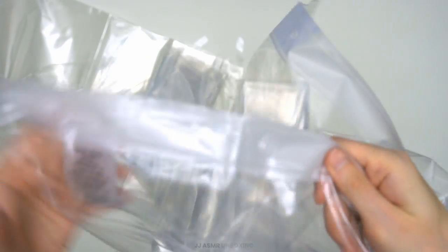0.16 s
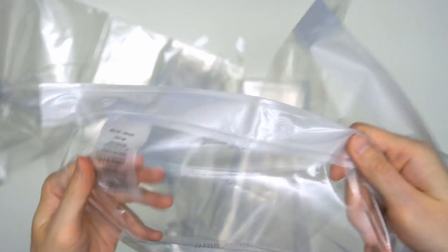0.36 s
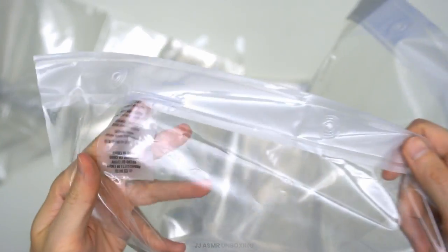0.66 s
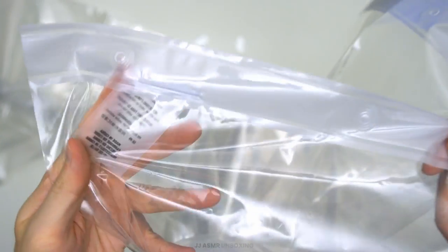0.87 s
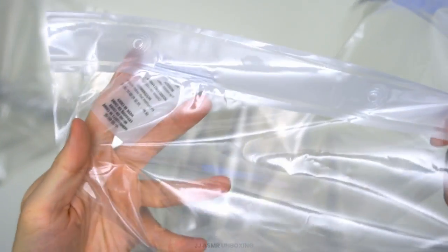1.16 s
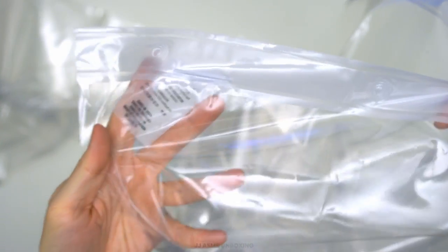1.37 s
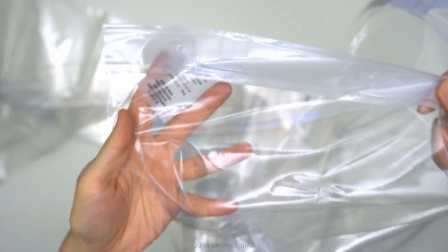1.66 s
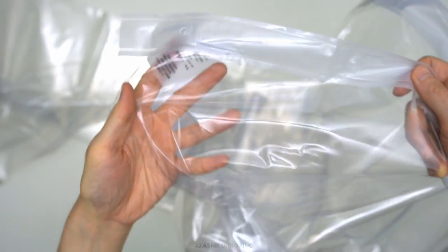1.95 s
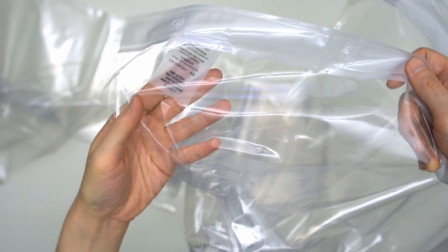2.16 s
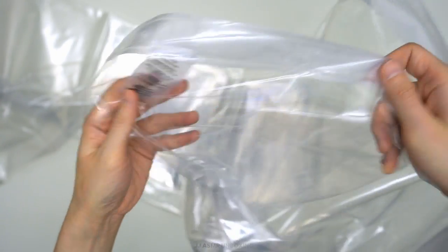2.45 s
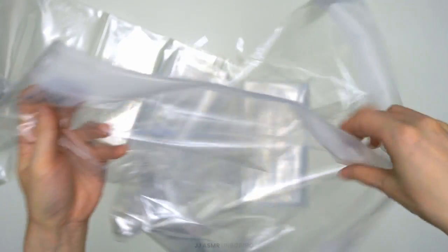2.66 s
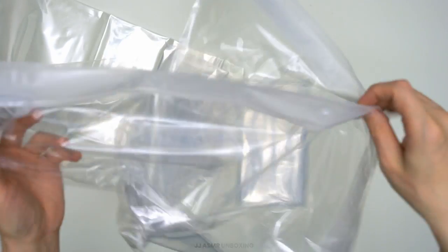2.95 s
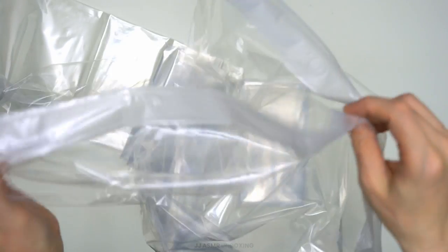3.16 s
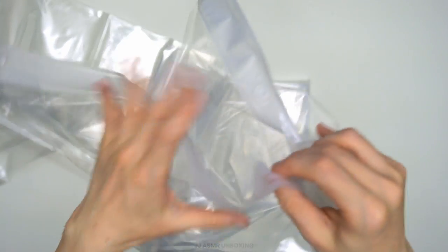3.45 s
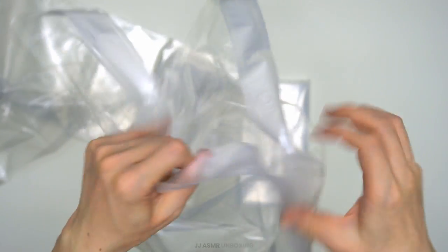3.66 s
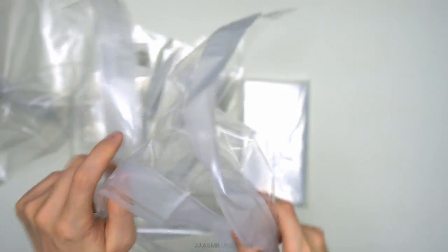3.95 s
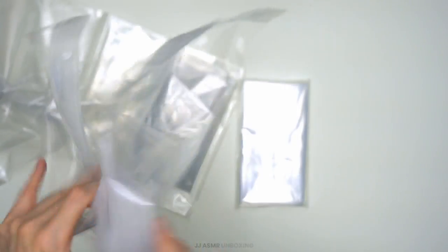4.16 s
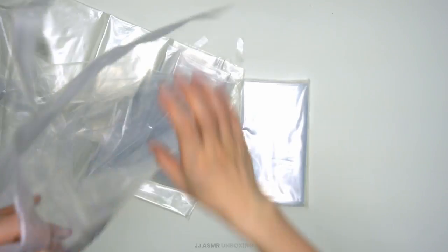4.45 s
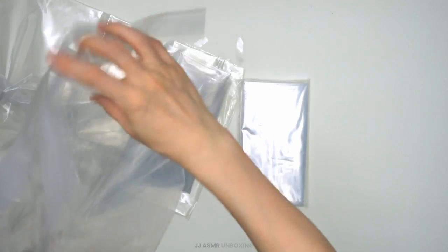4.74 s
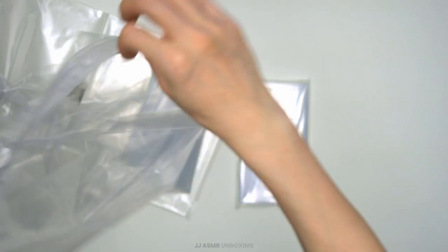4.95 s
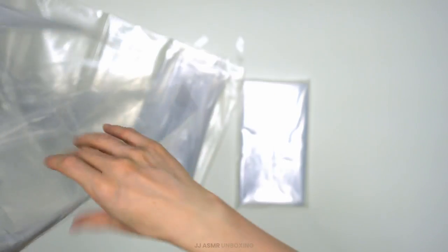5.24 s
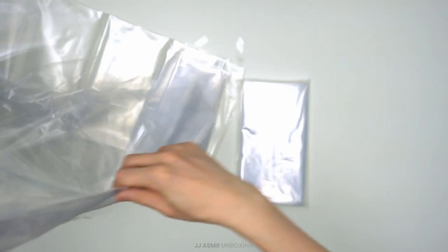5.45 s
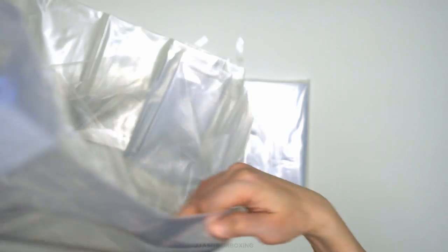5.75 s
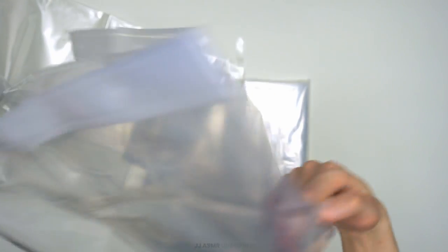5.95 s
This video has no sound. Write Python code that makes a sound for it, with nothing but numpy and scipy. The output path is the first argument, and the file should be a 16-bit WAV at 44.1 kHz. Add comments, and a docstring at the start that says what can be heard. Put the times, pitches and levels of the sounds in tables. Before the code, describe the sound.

Hands unfold a thin, stiff plastic sheet close by, with sharp crackling snaps, fine rustling and soft puffs of air in a small quiet room.

```python
"""A thin, stiff plastic sheet snaps crease by crease as hands unfold it over a table, heard from close by.
Snaps: timed noise bursts coloured as facet, loose flap and crease edge. Rustle: random small buckles between.
Trapped air: short damped sines. Draught: low noise in puffs and thuds. Room tone: steady shaped noise.
The walls of a small quiet room answer with decaying noise tails. Overall, the treble rolls off, steeply
above 15 kHz, silent above 17 kHz; peaks are softly limited."""
import sys
import numpy as np
from scipy import signal
from scipy.fft import rfft, irfft, next_fast_len
from scipy.io import wavfile

SR = 44100
rng = np.random.default_rng(int(sys.argv[2]) if len(sys.argv) > 2 else 0)


def wav_record(signal):
    """Record a signal, one row per channel, as 16-bit PCM in the file named by sys.argv[1]."""
    frames = np.transpose(np.atleast_2d(signal))
    bounded = np.clip(frames, -1, 1)
    # unit amplitude maps onto the largest positive 16-bit level
    quanta = np.round(bounded * 32767).astype(np.int16)
    wavfile.write(sys.argv[1], SR, quanta)


N = 269451


def amp(db):
    """Decibels to gain."""
    return 10 ** (np.asarray(db) / 20)


def unit(x):
    """Each row at rms 1."""
    return x / np.sqrt(np.mean(x ** 2, axis=-1, keepdims=True) + 1e-20)


def along(points, hz):
    """(Hz, value) points interpolated on a log frequency axis."""
    point_hz, value = np.transpose(points)
    return np.interp(np.log(hz + 1), np.log(point_hz + 1), value)


def filtered(x, response):
    """x times a response of frequency, zero-padded."""
    size = next_fast_len(N + SR // 2)
    spectrum = rfft(x, size) * response(np.fft.rfftfreq(size, 1 / SR))
    return irfft(spectrum, size)[..., :N]


def resonance(hz, centre_hz, sharpness):
    """Causal second-order band-pass of peak gain 1."""
    damping = 1j * hz * centre_hz / sharpness
    return damping / (centre_hz ** 2 - hz ** 2 + damping)


# room tone spectrum, relative: (frequency [Hz], density [dB per Hz])
TONE_SPECTRUM = [(20, -3), (40, -2), (66, -7.5), (250, -12), (600, -24), (1200, -16.5), (5000, -25),
                 (9000, -21.5), (15500, -14.5)]
TONE_DB = -46.5


def room_tone():
    """Steady noise of the quiet room, shaped by its spectrum."""
    tone = filtered(rng.standard_normal(N), lambda hz: amp(along(TONE_SPECTRUM, hz)))
    return amp(TONE_DB) * unit(tone)


# reverberation time: (frequency [Hz], t60 [s])
WALL_T60 = [(400, 0.18), (1500, 0.088), (5000, 0.25), (9000, 0.091), (14000, 0.21)]
# initial tail spectrum, relative: (frequency [Hz], level [dB])
WALL_COLOUR = [(400, 7), (800, -3), (2000, -4.5), (3000, -9.5), (5000, -4.5), (7000, -1), (9000, -4),
               (14000, -3.5)]
WALL_GAP_SAMPLES = 130


def room(x, count):
    """Walls answer after a short gap; the sheet moves, so each of count stretches gets its own noise tail."""
    wet = np.zeros(N + SR)
    edges = np.linspace(0, N, count + 1).astype(int)
    for start, end in zip(edges, edges[1:]):
        hz, t, noise = signal.stft(rng.standard_normal(SR // 2), SR, nperseg=256)
        colour_db = along(WALL_COLOUR, hz)[:, None]
        fade_db = colour_db - 60 * t / along(WALL_T60, hz)[:, None]
        tail = signal.istft(noise * amp(fade_db), SR, nperseg=256)[1][:SR // 2]
        echo = signal.fftconvolve(x[start:end], tail / np.linalg.norm(tail))
        wet[start:start + len(echo)] += echo
    return np.pad(wet, (WALL_GAP_SAMPLES, 0))[:N]


# air puffs from quick folds: (time [s], peak level [dB])
AIR_PUFFS = [(.43, -35.5), (.8, -47), (.87, -51), (1.03, -47), (1.43, -75), (2.67, -34), (2.87, -49),
             (3.53, -53), (3.6, -41), (3.68, -49), (3.91, -44.5), (4.27, -54), (5.37, -51)]
PUFF_RISE_S, PUFF_FALL_S = 0.026, 0.024
# steady air: base level, dB gained per dB of hand work, loss as the sheet is laid aside
AIR_DB, AIR_FOLLOWS, AIR_FADE_DB_PER_S = -33.5, 0.43, 1.22
KICK_DB, KICK_FADE_S = -19, 0.012  # air kicked by each flap: level over the flap, time constant


def draught():
    """Moved air as low noise: steady with the hands, in puffs at quick folds, a small thud at each snap's flap."""
    t = np.arange(N) / SR
    hand_s, hand_db = np.transpose(HAND_WORK)[:2]
    hands_now_db = np.interp(t, hand_s, hand_db)
    strength = amp(AIR_DB + AIR_FOLLOWS * hands_now_db - AIR_FADE_DB_PER_S * t)
    for s, db in AIR_PUFFS:
        puff = np.exp(np.minimum((t - s) / PUFF_RISE_S, (s - t) / PUFF_FALL_S))
        strength = strength + amp(db) * puff

    snap_s, *_, flap_db, _ = np.transpose(CREASE_SNAPS)
    kicks = np.bincount(np.round(snap_s * SR).astype(int), amp(flap_db + KICK_DB), N)
    kicks = signal.fftconvolve(kicks, np.exp(-t[:SR // 8] / KICK_FADE_S))[:N]

    thuds = filtered(rng.standard_normal(N), lambda hz: resonance(hz, 270, 0.43) ** 2)
    air = filtered(rng.standard_normal(N), lambda hz: resonance(hz, 80, 0.18) ** 2)
    return strength * unit(air) + kicks * unit(thuds)


# air between layers, ringing as a fold closes: (time [s], pitch [Hz], level before soft start [dB], t60 [s])
AIR_POCKETS = [ (.243, 505, -23.5, 0.06), (0.403, 465, -11.5, 0.056), (0.405, 960, -11.5, 0.045),
               (0.426, 476, -20, 0.042), (0.842, 470, -24.5, 0.096), (1.311, 688, -29.5, 0.11),
               (1.349, 1020, -39, 0.066), (2.675, 586, -12, 0.061), (2.724, 350, -19, 0.038),
               (2.759, 396, -13, 0.023), (3.674, 484, -19, 0.036), (4.235, 545, -23.5, 0.081),
               (4.8749, 1325, 0, 0.014), (4.873, 2330, -1, 0.0079), (5.645, 530, -19.5, 0.071), ]
POCKET_WANDER_CYCLES = .006  # phase drift per sample, standard deviation


def pockets():
    """Hollow, quickly damped sines with a soft start."""
    out, t = np.zeros(N + SR), np.arange(SR // 8) / SR
    for s, hz, db, t60_s in AIR_POCKETS:
        # the pocket changes shape as it rings
        cycles = hz * t + np.cumsum(rng.normal(0, POCKET_WANDER_CYCLES, len(t)))
        fade = amp(db - 60 * t / t60_s)
        soft_start = 1 - np.exp(-(hz * t / 0.68) ** 2)
        out[round(s * SR):][:len(t)] += fade * soft_start * np.sin(2 * np.pi * cycles)
    return out[:N]


FRAME = 768  # samples per buckle
RING = 1.1  # strength of a facet's own notes


def buckles(rows, flap_hz, first_db, die_ms, rise, spiky_db, edge_haste):
    """Each row is a ragged burst of cracks that shakes a facet, flaps the loose sheet and hisses at the crease.
    Returns the near sound and what goes to the walls: summed over all directions, its colour is smooth."""
    s, burst_ms, facet_hz, facet_db, flap_db, edge_db = np.transpose(rows)[:, :, None]
    ms, hz = np.arange(FRAME) / SR * 1000, np.fft.rfftfreq(FRAME, 1 / SR)

    unevenness = amp(spiky_db * rng.standard_normal((len(s), FRAME)))
    cracks = rng.standard_normal((len(s), FRAME)) * unevenness
    # quick snaps open with one thin, strong crack; slow creases roll in softly
    first = np.sign(cracks[:, :1]) * amp(first_db) / burst_ms * (ms == 0)
    start = 1 - np.exp(-ms / (rise * burst_ms))
    after_burst_ms = np.clip(ms - burst_ms, 0, None)
    hold = start * np.exp(-after_burst_ms / die_ms - ms / 8)

    facet = resonance(hz, facet_hz, .7) ** 2 / (1 + 1j * hz / 8000) ** 2
    note_hz = facet_hz * 2 ** rng.uniform(-0.75, 1, (2, len(s), 1))  # two notes per facet
    notes = 1 + RING * resonance(hz, note_hz, 6).sum(axis=0)
    radiates = (1j * hz / 500 * resonance(hz, 500, 1.0)) ** 2  # too small a sheet to send out bass
    flap = resonance(hz, flap_hz, 0.64) ** 2 * radiates
    edge = resonance(hz, 11500, .8) ** 3

    near = far = 0
    for db, colour, own, shape in [
        (facet_db, facet, notes, hold),
        (flap_db, flap, 1, hold ** .5),  # the loose sheet is slower to settle
        (edge_db, edge, 1, hold ** edge_haste),
    ]:
        gain = amp(db) * np.sqrt(.005 * SR / FRAME)  # row levels are rms over 5 ms
        burst = irfft(rfft(first + cracks * shape) * colour * own, FRAME)
        near = near + gain * unit(burst)
        far = far + gain * unit(irfft(colour, FRAME))
    where = np.round(s * SR).astype(int) + np.arange(FRAME)
    return np.array([np.bincount(where.ravel(), sound.ravel(), N + FRAME)[:N] for sound in (near, far)])


# hand work: (time [s], small-buckle level [dB], flap over it [dB], edge hiss over it [dB])
HAND_WORK = [(0, -35, 4.5, -3), (.2, -35.5, -4, 4), (.4, -36, 1.5, -3), (.56, -41, 5, 6.5),
             (.71, -47, 8, 3), (0.811, -32, 2, 4.5), (.92, -52.5, 4, 3), (1.05, -55, 2, 1),
             (1.4, -57, 2, -7), (1.72, -69, -14, 0), (2.02, -38, -36, 7.5), (2.3, -57, 2, -11),
             (2.45, -44, 1, -3), (2.7, -31, 1, 2), (2.94, -37.5, -1.5, -3), (3.13, -35.5, -8, 5),
             (3.28, -38.5, -23, 0), (3.4, -48, -34, 11.5), (3.56, -32, -5, 2.5), (3.76, -41, -2, 2.5),
             (4.0, -36.5, -2, 3.5), (4.3, -30.5, -8.5, -4), (4.68, -40, -2.5, 0.5), (4.94, -32, -5.5, 0),
             (5.25, -38, -9, 4), (5.44, -31, 0.5, 0.5), (5.58, -44, 4.5, 8), (5.78, -30.5, 2.5, 1),
             (5.93, -42, 0, 3), (6.11, -53.5, 11.5, -15)]
CROWD_BEFORE_S, CROWD_AFTER_S = 0.0087, 0.023  # reach round a snap, time constants
CROWD_SHARE, CROWD_MID_DB = 0.34, -32.5  # dB per dB of snap; snap level that changes nothing


def rustle(count, faint_db, facet_hz):
    """Random small buckles, most faint and a few strong, following the hands and louder round the snaps."""
    when, size, length, pitch = rng.random((count, 4)).T
    s = when * N / SR
    hand_s, level_db, flap_db, edge_db = np.transpose(HAND_WORK)
    snap_s, _, _, *snap_dbs = np.transpose(CREASE_SNAPS)
    since_s = s[:, None] - snap_s
    close = np.exp(np.minimum(since_s / CROWD_BEFORE_S, -since_s / CROWD_AFTER_S))
    size_db = faint_db - 4 * np.log(1 - .97 * size)

    dbs = []
    for over_db, snap_db in zip((0, flap_db, edge_db), snap_dbs):
        nearby_db = 20 * np.log10(close @ amp(snap_db) + 1e-5)
        hands_now_db = np.interp(s, hand_s, level_db + over_db)
        crowd_db = CROWD_SHARE * (nearby_db - CROWD_MID_DB)
        dbs.append(hands_now_db + crowd_db + size_db + rng.normal(0, 2.77, count))

    burst_ms = 1.18 + 3 * length ** 2
    rows = np.transpose([s, burst_ms, facet_hz * 5.5 ** (pitch - .5), *dbs])
    return buckles(rows, flap_hz=820, first_db=17, die_ms=.9, rise=.25, spiky_db=2.5, edge_haste=.8)


# creases snapping over: (time [s], burst [ms], facet pitch [Hz], facet [dB], flap [dB], edge [dB])
CREASE_SNAPS = [(0.0009, 1.3, 3060, -13.5, -19.5, -15.5), (0.0255, 0.46, 2470, -20.5, -46, -27),
                (0.0313, 1.2, 3200, -23, -39, -20), (0.048, 1.9, 2490, -25, -39, -35),
                (0.057, 0.52, 3560, -23, -42, -54), (0.067, 1.4, 1740, -25, -28, -50),
                (0.0735, 1.2, 4500, -24, -44, -13.5), (0.077, 2.3, 3670, -19, -44, -20),
                (0.0832, 9.4, 3780, -29, -29, -29), (0.105, 0.77, 2930, -27, -33, -40),
                (0.1126, 2, 2500, -34, -26.5, -45), (0.1217, 1.3, 4540, -25, -47, -6.5),
                (0.125, 1.3, 3930, -25, -48, -12), (0.1318, 0.93, 5330, -18.5, -23, -22),
                (0.1454, 3.1, 4030, -40, -24.5, -25), (0.151, 3, 2960, -16, -50, -38),
                (0.168, 1.5, 4000, -33, -42, -36), (0.1751, 0.56, 4100, -18, -24.5, -30),
                (0.243, 1.4, 2550, -26, -24, -59), (0.262, 1.5, 4670, -19, -28.5, -17.5),
                (0.2889, 1.3, 2300, -30, -38, -51), (0.336, 1.3, 3440, -26.5, -27, -45),
                (0.3433, 1.8, 2570, -38, -28, -22.5), (0.358, 1.2, 2500, -34, -51, -49),
                (0.366, 1.7, 3620, -24.5, -44, -44), (0.383, 1.5, 5800, -16, -24.5, -6),
                (0.389, 2.5, 2780, -31, -41, -26), (0.3986, 5.8, 2000, -48, -20, -52),
                (0.4067, 1.5, 1250, -25.5, -19, -55), (0.424, 3.3, 1470, -44, -27, -52),
                (0.4476, 2, 3630, -27, -40, -26), (0.455, 10, 5100, -21.5, -31, -18.5),
                (0.4773, 1, 2970, -29, -40, -45), (0.5107, 3, 5700, -22.5, -56, -18),
                (0.5537, 1.2, 3880, -20, -68, -27), (0.5708, 2.3, 3400, -27, -49, -37),
                (0.6299, 1.4, 1760, -37, -34.5, -60), (0.6557, 3.2, 1260, -36, -76, -64),
                (0.7, 1.6, 1480, -38.5, -50, -47), (0.7462, 3.2, 4000, -27.5, -30, -21.5),
                (0.8013, 2.3, 3750, -37, -54, -20), (0.816, 27, 5230, -23.5, -57, -52),
                (0.8365, 1.5, 4000, -29, -43, -24), (0.8449, 4.5, 5530, -18.5, -23.5, -12),
                (0.8556, 1.5, 1700, -46, -31, -71), (0.8964, 0.73, 4400, -27, -30, -31),
                (0.9375, 2, 3940, -25.5, -30, -31), (0.9636, 1.2, 2810, -32, -56, -61),
                (0.9765, 0.92, 3220, -35, -34, -33), (1.005, 2, 5000, -13.5, -21.5, -15),
                (1.0119, 0.64, 3200, -27, -33, -15.5), (1.0274, 0.33, 2900, -15.5, -28, -37),
                (1.1259, 4.1, 3640, -25, -34, -24), (1.2079, 1.1, 1230, -31.5, -68, -45),
                (1.2198, 2.4, 1450, -49, -40, -64), (1.242, 2.4, 3380, -40.5, -40.5, -29),
                (1.3102, 5.6, 2030, -35, -30, -40), (1.3336, 1.6, 1800, -50, -46, -69),
                (1.3487, 13, 1360, -62, -41, -74), (1.419, 1.3, 5300, -12, -26, -5.5),
                (1.477, 1.1, 3460, -49, -43, -54), (1.5172, 1.4, 2870, -23, -36.5, -29),
                (1.547, 2.4, 2670, -39, -43, -51), (1.595, 3.8, 1500, -64, -44.5, -64),
                (1.6781, 1.5, 3400, -31, -41, -65), (1.7063, 3.3, 1860, -47, -40, -61),
                (1.782, 1.4, 1860, -45.5, -45.5, -68), (1.813, 1.5, 3200, -69, -71, -64),
                (1.8617, 1.4, 2850, -30, -35, -34.5), (1.9502, 9.7, 1300, -53, -39, -48),
                (2.0343, 3.6, 2670, -48, -44, -53), (2.045, 2.4, 1580, -65, -34.5, -74),
                (2.072, 2, 6000, -58, -65, -53), (2.1144, 1.6, 3340, -29.5, -26.5, -27),
                (2.1896, 1.9, 2950, -29.5, -30, -46), (2.2155, 1.8, 5000, -49, -62, -40),
                (2.2816, 0.57, 3140, -33.5, -28, -44), (2.3437, 1.4, 2770, -26.5, -25, -30.5),
                (2.3742, 0.98, 2740, -41, -39, -31.5), (2.391, 2.3, 2640, -41, -35, -60),
                (2.4173, 11, 3570, -27.5, -27.5, -42), (2.434, 1.1, 4500, -26, -42, -24),
                (2.4523, 0.89, 4960, -16, -45, -7.5), (2.538, 3.4, 3520, -25, -21, -31),
                (2.5524, 2.4, 2330, -37, -26, -29), (2.565, 1.5, 5000, -36, -48, -35),
                (2.598, 1.8, 3280, -21.5, -28, -17), (2.608, 1.4, 4500, -21, -32, -20),
                (2.6189, 8.7, 2840, -29, -25, -41), (2.6305, 1.4, 3300, -22.5, -45, -45),
                (2.644, 4.1, 1500, -37, -36, -50), (2.6577, 1, 4800, -20, -27, -22),
                (2.6698, 2.2, 3930, -18, -35, -22), (2.6758, 1.3, 3060, -12.5, -19.5, -12),
                (2.6867, 1.6, 3320, -13, -40, -16), (2.724, 4.3, 2600, -32, -23, -31),
                (2.7428, 2, 2000, -32, -35, -50), (2.7464, 0.56, 4800, -13, -20.5, -4),
                (2.7748, 4, 4800, -18.5, -34, -41), (2.7997, 2.2, 2780, -33, -37, -48),
                (2.8298, 3, 3040, -34, -32, -30), (2.842, 3.7, 3620, -24, -28, -40),
                (2.8676, 1.4, 3240, -15, -20.5, -9), (2.892, 1.5, 3960, -20.5, -50, -48),
                (2.9068, 0.71, 3800, -20, -21, -13), (2.92, 2.2, 4600, -21, -29, -47),
                (2.9545, 1.1, 2950, -23, -23, -12), (3.001, 2, 1600, -63, -30, -61),
                (3.019, 4.1, 2720, -29.5, -49, -57), (3.0569, 0.59, 2030, -35, -35, -44),
                (3.085, 2.1, 2870, -32.5, -59, -64), (3.112, 25, 3570, -24, -53, -33),
                (3.13, 10, 4600, -21, -43, -18.5), (3.1391, 2.5, 2500, -24, -36, -45),
                (3.1474, 1.1, 2500, -28, -41, -51), (3.2135, 1.5, 4400, -22.5, -26, -46),
                (3.261, 6, 3800, -31, -37.5, -33), (3.284, 14, 3500, -35.5, -42, -37),
                (3.372, 2, 1100, -49, -58, -80), (3.403, 2, 1290, -50, -47, -57),
                (3.42, 1.6, 1100, -55, -54, -70), (3.483, 1.6, 1200, -57, -55, -57),
                (3.517, 9.4, 3000, -42, -35, -36), (3.5435, 3.1, 3280, -23, -36, -38),
                (3.578, 1.2, 5700, -13, -22.5, -12), (3.5994, 3.6, 3750, -38, -51, -39),
                (3.608, 0.79, 2500, -26.5, -20.5, -43), (3.6474, 1.6, 3520, -33, -27.5, -45),
                (3.6749, 4.5, 3150, -19.5, -19.5, -21), (3.683, 3.3, 3860, -20.5, -22, -19),
                (3.708, 2.9, 3050, -25, -57, -50), (3.7282, 1, 4730, -21.5, -29.5, -25),
                (3.813, 2.5, 2930, -30, -59, -41), (3.849, 6.5, 3200, -35, -34, -24.5),
                (3.8652, 1.3, 5300, -24, -54, -21), (3.8834, 20, 3640, -23.5, -29, -38),
                (3.9089, 1.3, 2810, -18, -23.5, -19.5), (3.919, 6.4, 2900, -48, -24.5, -53),
                (3.9908, 1.8, 4300, -21, -37, -33), (4.088, 2.7, 3730, -27.5, -50, -28),
                (4.1135, 3, 3400, -21, -28, -55), (4.1933, 4.4, 1630, -39, -28, -38),
                (4.206, 7.8, 2210, -21.5, -22.5, -18.5), (4.236, 1.6, 1810, -21.5, -21, -26),
                (4.2633, 0.83, 2860, -19.5, -28, -23.5), (4.224, 1, 2500, -28, -37, -35),
                (4.292, 2, 1500, -54, -52, -53), (4.31, 10, 2500, -46, -39, -45),
                (4.327, 2.7, 2720, -29, -36, -49), (4.335, 20, 2110, -22.5, -53, -20),
                (4.341, 7.1, 4300, -21.5, -53, -40), (4.3483, 5, 3740, -19, -23.5, -9),
                (4.366, 0.86, 4600, -17.5, -57, -22), (4.3732, 5.7, 3500, -23, -31.5, -36),
                (4.44, 4.7, 2970, -30, -35, -35), (4.4748, 3, 2800, -39, -39, -43),
                (4.515, 25, 1880, -30, -32, -48), (4.5359, 3.6, 3260, -26, -30, -33),
                (4.553, 3.1, 4500, -34, -42, -31), (4.5826, 1, 3040, -13, -20, -17.5),
                (4.606, 3.4, 3400, -49, -27, -42), (4.613, 0.87, 3100, -29, -33, -44),
                (4.625, 1.3, 4360, -33, -40, -22), (4.6658, 0.84, 5230, -21, -50, -17),
                (4.7276, 1.1, 3240, -35, -44, -55), (4.7358, 1.1, 2160, -38, -52, -53),
                (4.7835, 22, 2480, -40, -42, -39), (4.8693, 1, 1800, -40, -42, -44),
                (4.8728, 3.6, 4380, -21.5, -27.5, -14.5), (4.9195, 2.1, 1500, -43, -27.5, -57),
                (4.9255, 9.7, 2200, -33, -29, -50), (4.941, 3.2, 2000, -37, -29, -61),
                (4.989, 2.3, 2300, -38, -37, -64), (5.0196, 2.3, 5600, -23.5, -33, -52),
                (5.0363, 2.5, 3300, -32.5, -22.5, -24), (5.1068, 1.6, 2060, -49, -30, -40),
                (5.1246, 1.8, 5100, -27.5, -36, -40), (5.135, 3.9, 3030, -32, -30, -54),
                (5.1552, 4.9, 3000, -34, -36, -28), (5.167, 2.9, 1500, -45, -29, -51),
                (5.246, 3.3, 4500, -37, -53, -51), (5.259, 2.9, 3200, -29, -30.5, -36),
                (5.2929, 2.9, 4440, -28, -44, -40), (5.3257, 4, 1920, -52, -46, -60),
                (5.3684, 2.9, 4160, -14.5, -20.5, -36), (5.3985, 1.6, 4040, -29, -29, -30),
                (5.443, 2.4, 1820, -40, -39, -46), (5.414, 3, 2500, -41, -27, -50),
                (5.451, 2.9, 3980, -29, -30, -42), (5.468, 4.3, 3350, -27, -59, -45),
                (5.5178, 1.4, 2300, -27, -41, -62), (5.528, 2.2, 2000, -37, -48, -66),
                (5.605, 4.4, 2380, -33, -71, -72), (5.6459, 1.2, 3160, -18, -21.5, -26),
                (5.6903, 3.1, 2700, -25.5, -38, -33), (5.781, 3, 3800, -44, -55, -50),
                (5.808, 4.5, 2740, -36, -57, -69), (5.835, 1.8, 1120, -36, -45, -61),
                (5.884, 4.9, 2030, -39, -61, -62), (5.9012, 5.5, 3340, -32.5, -33.5, -35),
                (5.93, 8.1, 2710, -41, -35.5, -34), (5.982, 2.4, 3800, -30.5, -86, -38),
                (6.05, 3.3, 1340, -42, -45, -70), (6.072, 5, 2960, -51, -61, -65)]


def snaps():
    """Creases snap over one by one: strong buckles whose crease hiss dies first."""
    return buckles(CREASE_SNAPS, flap_hz=1102, first_db=18.5, die_ms=1.67, rise=0.076, spiky_db=4.5,
                   edge_haste=1.9)


def scene():
    """The sheet, its room and the quiet behind it."""
    trapped_air = amp([[0], [-8]]) * pockets()  # near, to the walls
    near, far = snaps() + trapped_air + rustle(count=3400, faint_db=-14.5, facet_hz=2420)
    walls = amp(-7) * room(far, count=32)
    return (near + walls + draught() + room_tone())[None]


# overall tone: (frequency [Hz], gain [dB])
OVERALL_TONE = [(200, -7), (6000, 0), (8500, -8), (13000, -15.5), (15500, -26), (15900, -32), (17000, -50)]
TOP_HZ = 17000


def record(dry):
    """Overall tone: treble rolls off, steeply above 15 kHz, silent above 17 kHz; peaks softly limited."""
    x = filtered(dry, lambda hz: amp(along(OVERALL_TONE, hz)))
    x = x / (1 + np.abs(x / .98) ** 8) ** (1 / 8)
    return filtered(x, lambda hz: hz < TOP_HZ)


dry = scene()
out = record(dry)
wav_record(out)
```